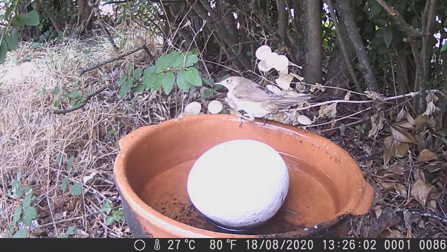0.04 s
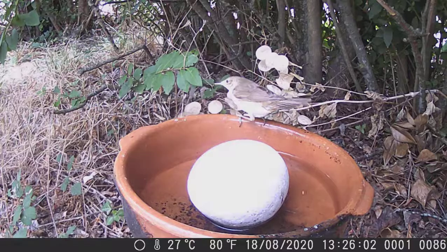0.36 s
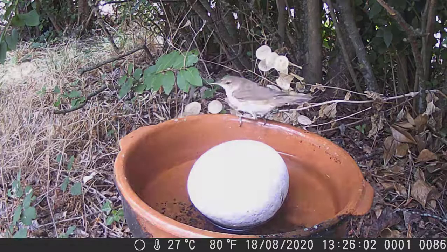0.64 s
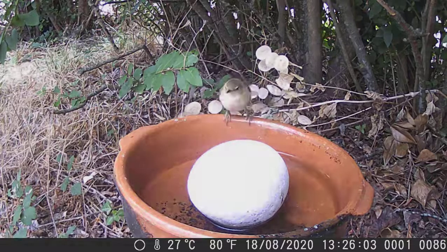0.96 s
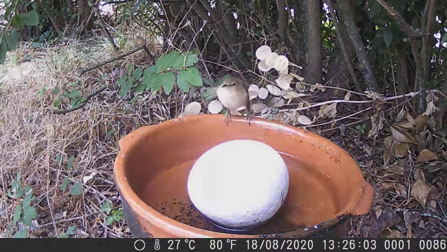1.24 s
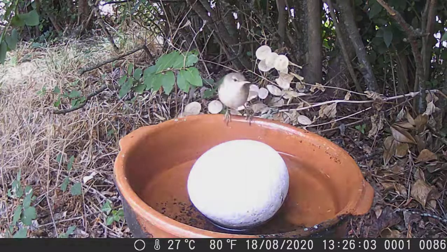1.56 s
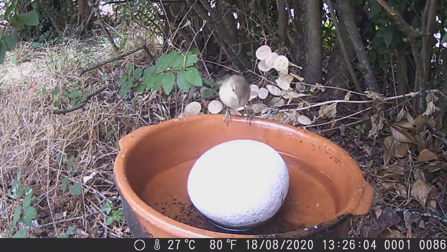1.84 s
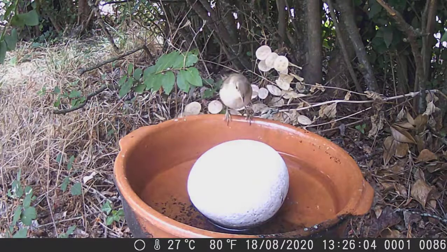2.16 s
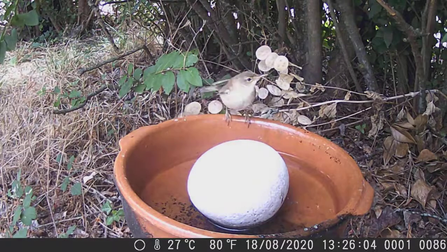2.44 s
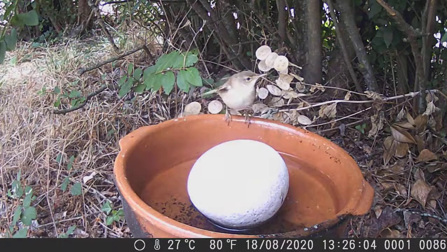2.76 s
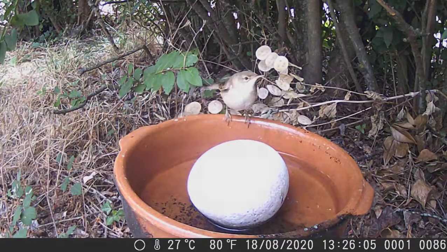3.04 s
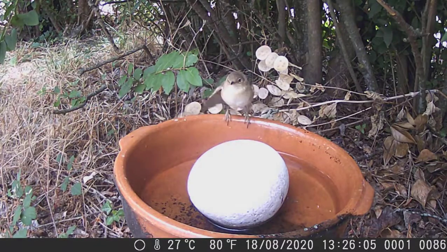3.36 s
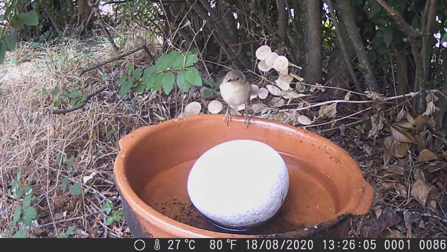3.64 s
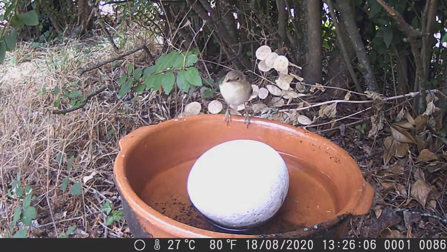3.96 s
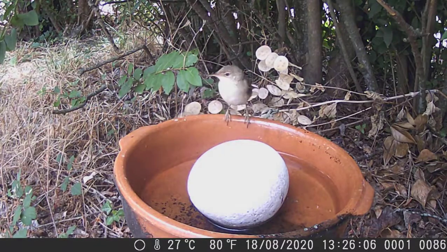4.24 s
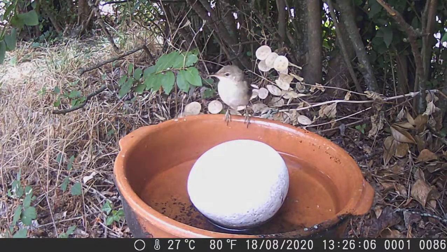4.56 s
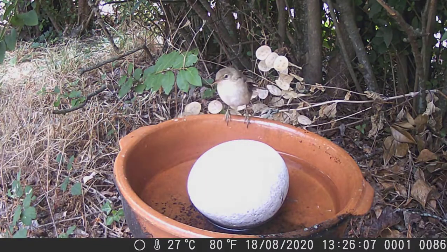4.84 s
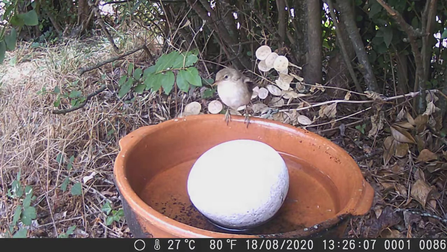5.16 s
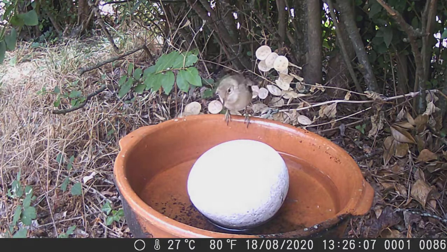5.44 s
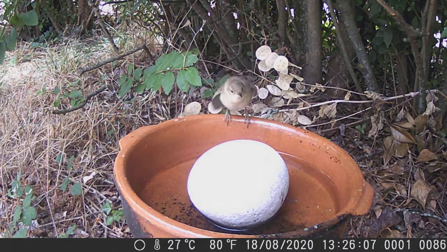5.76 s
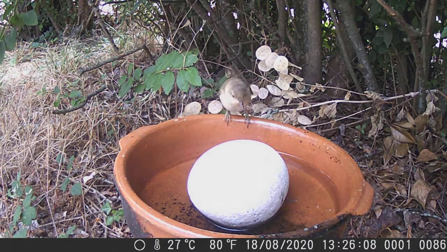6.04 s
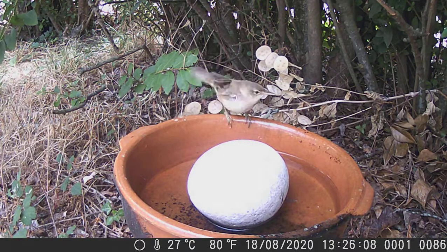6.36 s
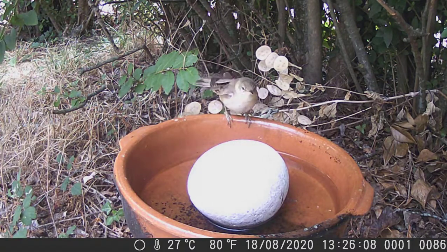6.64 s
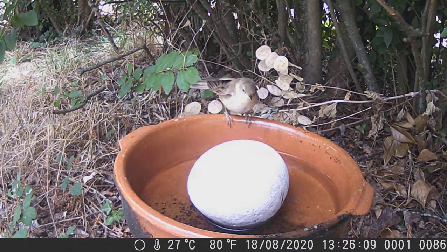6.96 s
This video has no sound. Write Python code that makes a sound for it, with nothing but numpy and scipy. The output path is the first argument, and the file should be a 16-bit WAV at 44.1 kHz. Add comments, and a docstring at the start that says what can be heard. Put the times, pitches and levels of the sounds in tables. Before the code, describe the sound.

In a still garden, a small outdoor camera's microphone comes on with one bright click and two much smaller ticks. A quiet low rumble follows and stays to the end, carrying soft, dull pulses at about five a second. A faint low hum wavers beneath it, and the microphone adds a trace of high hiss.

```python
"""Trail camera in a still garden

A camera watches a bird bath, and its microphone picks up little but a low rumble and amplifier hiss.
Voltage steps give a click and two small ticks as the input switches on.
Five times a second the rumble throbs and flutters, probably the camera's own work tugging at
its supply. A faint, wavering hum lies underneath."""
import sys
import numpy as np
from scipy import signal
from scipy.fft import rfft, irfft
from scipy.io import wavfile

SR = 44100
rng = np.random.default_rng(int(sys.argv[2]) if len(sys.argv) > 2 else 0)


def wrap_up_sound(samples):
    """Save the sound to the file named by the first command line argument, as 16-bit audio."""
    columns = np.atleast_2d(samples).T
    # keep every value between -1 and 1, then stretch to whole-number steps
    tamed = np.clip(columns, -1, 1)
    steps = np.round(tamed * 32767).astype(np.int16)
    wavfile.write(sys.argv[1], SR, steps)


N = 309141


def from_db(db):
    return 10 ** (np.asarray(db) / 20)


def unit_rms(x):
    return x / np.sqrt(np.mean(x ** 2) + 1e-20)


def band_pass(x, hz, width_hz):
    """A two-pole band-pass filter with unit gain at its peak."""
    r = np.exp(-np.pi * width_hz / SR)
    feedback = [1, -2 * r * np.cos(2 * np.pi * hz / SR), r * r]
    return signal.lfilter((1 - r * r) / 2 * np.array([1, 0, -1]), feedback, x)


def coloured_noise(spectrum):
    """Spectral shaping of white noise, interpolated on a log frequency axis; unit rms."""
    hz, db = np.transpose(spectrum)
    bin_hz = np.maximum(np.arange(N // 2 + 1) * SR / N, 1)
    gain = from_db(np.interp(np.log(bin_hz), np.log(hz), db))
    return unit_rms(irfft(rfft(rng.standard_normal(N)) * gain, N))


def drift(rate_hz):
    """Linear interpolation between random values gives a slow fluctuation; unit rms."""
    place = np.arange(N) / SR * rate_hz
    values = rng.standard_normal(N // 100)
    return unit_rms(np.interp(place, np.arange(len(values)), values))


# Voltage steps at switch-on: start_s, height_full_scale, rise_s
SWITCH_STEPS = [(0.0975, 0.11, .00021), (0.1235, -0.013, .00006), (0.1496, -0.018, .00006)]
# Two treble peaks that give the click its bright edge: centre_hz, width_hz, gain_db
CLICK_BRIGHTNESS = [(7700, 1800, -14), (14300, 2200, -17)]
def switch_on(leak_s=0.12, hold_hz=14700):
    """Step response: each step rises sharply and leaks away through the coupling capacitor."""
    held_t = np.floor(np.arange(N) * hold_hz / SR) / hold_hz  # held samples make bright stairs of an edge
    steps = np.zeros(N)
    for start_s, height, rise_s in SWITCH_STEPS:
        age = np.maximum(held_t - round(start_s * hold_hz) / hold_hz, 0)
        steps += height * np.minimum(age / rise_s, 1) ** 0.66 * np.exp(-age / leak_s)
    bright_edge = sum(from_db(db) * band_pass(steps, hz, width) for hz, width, db in CLICK_BRIGHTNESS)
    return steps + bright_edge


# Spectrum of the rumble: frequency_hz, relative_density_db
RUMBLE_SPECTRUM = [(12, -5.5), (35, 2), (65, -3), (100, -9), (140, -15.5), (220, -19), (280, -21.5),
                   (400, -25.5), (1000, -32), (2000, -38), (2850, -42.5), (3200, -48.5), (3600, -46),
                   (9000, -73.5)]
def rumble(level_db=-54.5):
    """Stationary noise with its power concentrated at low frequencies."""
    return from_db(level_db) * coloured_noise(RUMBLE_SPECTRUM)


# Spectrum of the hiss: frequency_hz, relative_density_db
HISS_SPECTRUM = [(3000, -13), (4500, -4), (6200, -1.5), (6900, 1), (8800, 0), (10000, -4.5), (11400, -6),
                 (12150, -3.5), (12800, -6.5), (13500, -3), (14800, -2), (15700, -6.5)]
def amplifier_hiss(level_db=-84.5):
    """Self-noise of the microphone amplifier, a thin band of treble."""
    return from_db(level_db) * coloured_noise(HISS_SPECTRUM)


def hum(t, pitch_hz=113.1, level_db=-70.5, waver_hz=0.88, waver_db=2.0):
    """Slow random modulation of frequency and amplitude makes a low sine tone waver."""
    cycles = pitch_hz * t + np.cumsum(waver_hz * drift(3)) / SR
    amplitude = np.sqrt(2) * from_db(level_db + waver_db * drift(1.4))
    return amplitude * np.sin(2 * np.pi * cycles)


def throb_beat(first_s=0.2665, period_s=0.2, swing_s=0.0098, swing_period_s=1.0, latest_at_s=0.561):
    """Pulse-position modulation swings a steady beat late and early. Rows: time_s, accent_db."""
    even_s = np.arange(first_s, N / SR, period_s)
    late_s = swing_s * np.cos(2 * np.pi * (even_s - latest_at_s) / swing_period_s)
    accent_db = 1.5 * rng.standard_normal(len(even_s))
    return np.column_stack([even_s + late_s, accent_db])


def throbs(t, beat, level_db=-41.5, kick_s=0.0036, sag_s=0.011, sag_delay_s=0.041):
    """Bipolar Gaussian pulses: a short soft kick, then a longer sag, never twice quite alike."""
    pulses = np.zeros(N)
    stretches = np.exp(0.14 * rng.standard_normal((len(beat), 3)))
    for (time_s, accent_db), (kick_stretch, sag_stretch, delay_stretch) in zip(beat, stretches):
        near = abs(t - time_s) < 0.2
        age = t[near] - time_s
        kick = np.exp(-0.5 * (age / (kick_s * kick_stretch)) ** 2)
        sag = np.exp(-0.5 * ((age - sag_delay_s * delay_stretch) / (sag_s * sag_stretch)) ** 2)
        pulses[near] += from_db(level_db + accent_db) * (kick - sag)
    return pulses - pulses.mean()


# Spectrum of the flutter: frequency_hz, relative_density_db
FLUTTER_SPECTRUM = [(20, 0), (60, 2), (110, -4), (150, -9.5), (230, -10), (330, -18.5), (500, -25),
                    (1000, -36), (4000, -71)]
def flutter(t, beat, level_db=-60.0, swell_s=0.029, lag_s=0.0044):
    """Amplitude modulation: low noise swells around each throb in proportion to its strength."""
    envelope = np.zeros(N)
    for time_s, accent_db in beat:
        falloff = 0.5 * ((t - time_s - lag_s) / swell_s) ** 2
        envelope += from_db(accent_db) * np.exp(-np.minimum(falloff, 20))
    return from_db(level_db) * envelope * coloured_noise(FLUTTER_SPECTRUM)


def scene():
    """Superposition of all the sources, silent until the first step opens the input."""
    t = np.arange(N) / SR
    is_open = t >= SWITCH_STEPS[0][0]
    steady_noise = rumble() + amplifier_hiss()
    beat = throb_beat()
    background = steady_noise + throbs(t, beat) + flutter(t, beat) + hum(t)
    return (switch_on() + is_open * background)[None]


def record(dry, cutoff_hz=15800):
    """Band limiting: a steep low-pass filter removes the highest treble."""
    low_pass = signal.firwin(255, cutoff_hz, fs=SR)
    return signal.fftconvolve(dry, low_pass[None], mode="same")


dry = scene()
out = record(dry)
wrap_up_sound(out)
```